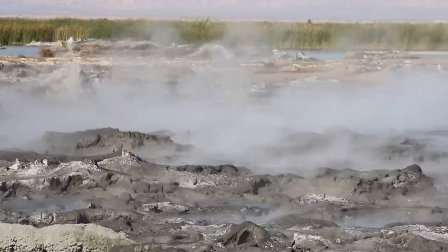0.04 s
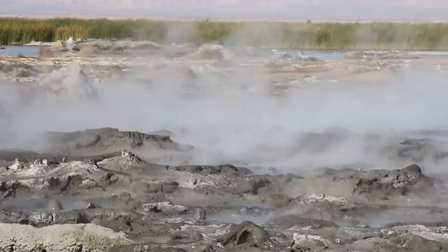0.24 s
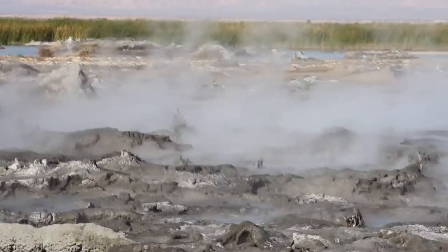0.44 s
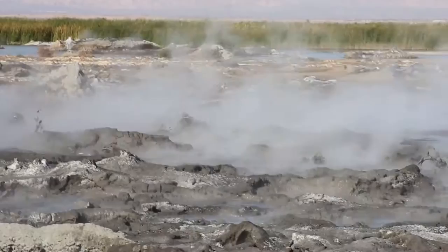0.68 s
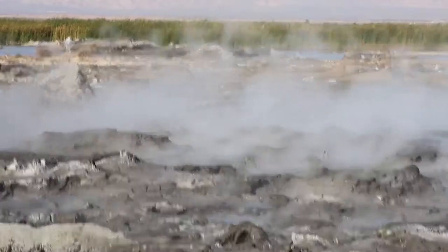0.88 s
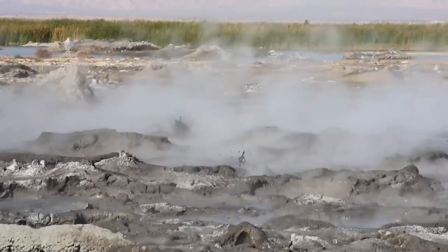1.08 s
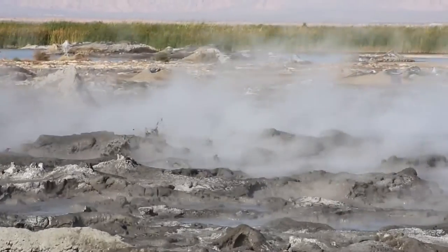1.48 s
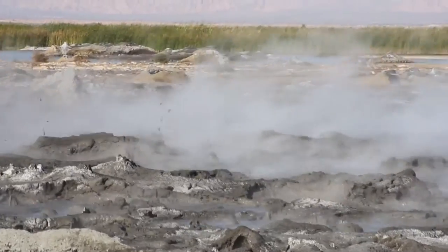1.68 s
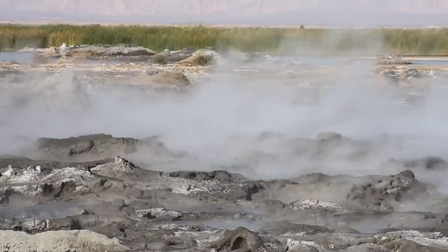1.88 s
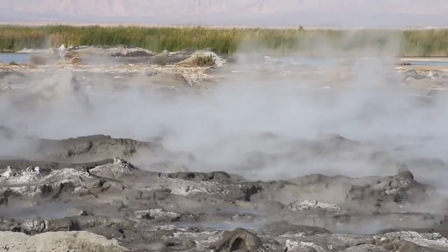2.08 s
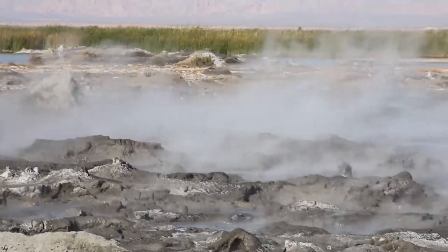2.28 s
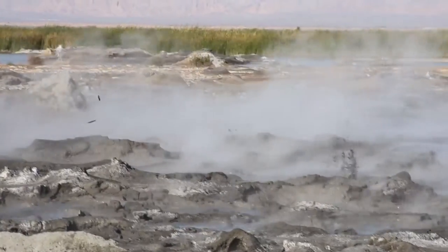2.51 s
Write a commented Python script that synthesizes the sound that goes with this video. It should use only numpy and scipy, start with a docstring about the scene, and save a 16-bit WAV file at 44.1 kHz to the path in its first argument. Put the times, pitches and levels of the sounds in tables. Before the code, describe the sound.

Thick mud boils, with irregular low plops and small wet spatters close to the microphone. Behind them, countless smaller bubbles simmer throughout over a steady steam hiss and a low, uneven rumble, in an open field without echo.

```python
"""An open, flat field of boiling mud pots, with no echo.
Gas bubbles burst in thick mud: each cavity is a damped resonator that rings for a few cycles,
most often rising in pitch as it opens. Films tear, flung mud spatters down, and mounds briefly
scatter these near sounds. Countless smaller bubbles simmer behind them, over a steady hiss
of steam and a low, uneven rumble."""
import sys
import numpy as np
from scipy import signal
from scipy.fft import rfft, irfft
from scipy.io import wavfile
from scipy.ndimage import uniform_filter1d

SR = 44100
rng = np.random.default_rng(int(sys.argv[2]) if len(sys.argv) > 2 else 0)


def dump(signal):
    """Clip the signal to [-1, 1] and save it as 16-bit WAV at the path in sys.argv[1]."""
    limited = np.clip(np.atleast_2d(signal).T, -1, 1)
    pcm = np.round(limited * 32767).astype(np.int16)
    wavfile.write(sys.argv[1], SR, pcm)


N = 116865

# Spectrum of the rumble. Each row: frequency in Hz, relative spectral density in dB.
RUMBLE_SPECTRUM = [(15, -14), (35, -4), (70, -2), (105, -1.5), (180, -20), (500, -68)]
# Low puffs of air. Each row: peak time in seconds, level in dB, rise and decay times in seconds.
AIR_PUFFS = [(.165, -46, .03, .02), (0.267, -31, 0.011, 0.05), (.63, -46, .03, 0.053),
             (0.887, -33.5, 0.028, 0.033), (.955, -38, 0.014, .018), (1.309, -34, 0.036, 0.032),
             (1.61, -56, .03, .08), (1.92, -46, 0.015, 0.025)]
# Spectrum of the steam. Each row: frequency in Hz, relative spectral density in dB.
STEAM_SPECTRUM = [(20, -32), (60, -12.5), (125, 2), (230, 3.5), (400, -7.5), (620, -2), (820, -16),
                  (1150, -13), (2000, -14.5), (2800, -19.5), (3900, -23), (4400, -24.5), (4900, -29),
                  (5600, -34), (7200, -35), (9800, -34.5), (12500, -41), (15500, -45)]
# Vigour of the boiling. Each row: time in seconds, gain in dB.
BOIL_VIGOUR = [(0, -2.5), (.2, -3.5), (.4, 0), (.85, 1), (1.1, 0.5), (1.7, -1), (2.1, -1), (2.38, 1.5),
               (2.5, -7.5), (2.65, -4.5)]
# Snaps of tearing film and falling mud. Each row: peak time in seconds, centre frequency in Hz,
# bandwidth as a share of it, level in dB, decay time in milliseconds, level of the spray in dB.
MUD_SNAPS = [(0.098, 1500, .3, -33, 3.4, -62), (0.101, 2780, .14, -33.5, 4, -60),
             (.229, 1500, .33, -33, 8, -56), (.261, 2300, 0.24, -36.5, 4.4, -66),
             (0.355, 2400, .25, -33.5, 2.3, -60), (.3705, 1650, .38, -23.5, 1.1, -62),
             (0.3722, 2460, 0.17, -30, 1.4, -60), (0.373, 1200, 0.26, -24, 1.3, -60),
             (.396, 1800, .3, -32, 3.4, -65), (.463, 1900, .2, -30, 2, -60),
             (0.4738, 1730, 0.34, -30.5, 5.9, -61), (0.493, 1780, 0.19, -26, 2.4, -58),
             (.499, 2800, 0.32, -39, 1.9, -44), (0.519, 3000, 0.13, -30, 1.6, -42),
             (.608, 1890, 0.33, -33, 2.4, -55), (0.693, 2300, 0.38, -35.5, 2.1, -54),
             (.709, 1650, .3, -35.5, 6, -58), (.843, 1150, .2, -31, 3, -62),
             (.884, 1500, 0.41, -33.5, 6.4, -58), (1.085, 1950, 0.22, -36, 2.9, -63),
             (1.120, 2000, .3, -44, 4, -49), (1.18, 2550, .15, -33.5, 2.7, -52),
             (1.357, 1940, 0.23, -34.5, 4.8, -58), (1.398, 1300, 0.35, -31, 9, -59),
             (1.678, 3100, 0.21, -35.5, 1.9, -46.5), (1.787, 2680, .3, -40, 3, -58),
             (1.816, 2900, .3, -37.5, 4.5, -47.5), (1.844, 2380, .12, -33, 5, -48.5),
             (1.875, 1550, 0.23, -30.5, 4, -57), (1.905, 845, .3, -28, 4, -64),
             (1.906, 2100, .28, -38, 3.6, -62), (1.917, 1300, .25, -30, 3, -60),
             (1.931, 1400, 0.51, -41, 10, -60), (1.953, 1600, 0.17, -34.5, 4, -62),
             (1.965, 1100, .3, -29, 3, -50), (2.184, 3380, 0.28, -36.5, 2.2, -54),
             (2.210, 1600, 0.32, -32.5, 5.2, -60), (2.378, 1390, 0.26, -30.5, 2.8, -55),
             (2.400, 2100, .15, -39, 6.5, -62), (2.413, 3950, .08, -37, 3.5, -53.5),
             (2.449, 1350, .45, -33.5, 5.8, -60)]
# Large bursting bubbles. Each row: peak time in seconds, pitch in Hz, peak level in dB,
# decay time in milliseconds, glide at the peak in octaves per 10 milliseconds (negative falls).
LARGE_BUBBLES = [(.062, 650, -35, 8.7, 0.02), (.069, 196, -22.5, 3.7, -0.16), (.101, 280, -21.5, 4.9, 0.17),
                 (0.224, 203, -21.5, 5, -0.08), (0.2572, 245, -13, 3.4, -0.2), (.266, 87, -17, 11, -0.03),
                 (0.2697, 252, -4.2, 3.6, 0.022), (.280, 300, -22, 3.5, 0), (.309, 195, -22, 8.5, -0.19),
                 (.376, 290, -21, 2.3, 0.069), (.3865, 253, -12, 6.8, 0.51),
                 (0.417, 267, -22.5, 5.1, -0.25), (.444, 300, -23.5, 5.2, 0.21),
                 (.452, 463, -27.5, 9.6, 0.071), (.474, 636, -27, 4.3, 0.16), (.505, 570, -27.5, 2.4, 0.51),
                 (.5197, 1020, -17.5, 0.9, 0.1), (0.523, 214, -21, 2.6, -0.49),
                 (.536, 510, -29, 2.6, -0.097), (.590, 135, -33, 17, -0.086), (.599, 218, -20, 3.5, -0.036),
                 (.640, 690, -23, 2.4, 0.61), (0.686, 132, -32, 9.3, -0.052), (.698, 370, -29.5, 4.8, 0.24),
                 (0.757, 275, -16.5, 8.5, .48), (.769, 230, -23, 6, -.2), (.775, 120, -29, 11, 0.082),
                 (.791, 215, -22.5, 4, -0.1), (.807, 210, -24, 3.5, 0), (.822, 140, -25, 6, 0.2),
                 (.835, 222, -16.3, 4.6, 0.05), (.8435, 630, -23, 2.6, 0.3), (.852, 220, -22.5, 4.5, 0),
                 (.874, 135, -28, 10, 0), (.904, 215, -24.5, 6, .1), (.883, 900, -31, 3.3, 0.32),
                 (.914, 694, -24, 1, 0.017), (.9605, 690, -24, 1.5, 0.15), (0.986, 276, -24.5, 6.7, -0.041),
                 (1.039, 198, -25, 5, 0.53), (1.08, 289, -23.5, 3.7, -0.12), (1.134, 523, -28, 5.5, 0.21),
                 (1.149, 500, -17.5, 0.66, 0.11), (1.18, 1130, -31, 2.5, 0.058),
                 (1.2235, 590, -23, 3.4, 0.13), (1.245, 222, -20, 3.1, 0.3),
                 (1.256, 292, -18.5, 2.8, -0.22), (1.2645, 700, -29.5, 3, 0.1),
                 (1.335, 290, -23.5, 6.8, 0.47), (1.349, 537, -30, 10, 0.24),
                 (1.442, 275, -16.5, 3.7, 0.54), (1.459, 491, -31, 4.9, 0.21),
                 (1.479, 278, -19.5, 2.5, -0.11), (1.5905, 712, -24, 1.5, 0.098),
                 (1.604, 259, -28, 3.8, .1), (1.607, 520, -19.5, 0.84, 0.16), (1.678, 960, -23, 2.1, .1),
                 (1.732, 264, -22, 3.3, 0.39), (1.7545, 580, -22.5, 2.2, 0.5), (1.765, 900, -29, 6, 0.38),
                 (1.806, 285, -22.5, 3.5, -0.12), (1.807, 1050, -30, 2, 0.22),
                 (1.9085, 210, -10.5, 3.1, -0.086), (1.914, 102, -29, 11, 0.025),
                 (1.9225, 275, -17, 8, -.2), (1.966, 402, -25.5, 1.8, -0.21),
                 (1.985, 128, -27.5, 18, -0.45), (2.033, 513, -26, 2, 0.6), (2.055, 710, -27.5, 1.7, .2),
                 (2.072, 290, -26, 4, .05), (2.235, 262, -23.5, 8.5, 0.31), (2.290, 620, -31, 7, .35),
                 (2.317, 245, -17, 5.5, .42), (2.335, 270, -22.5, 8.2, 0.013), (2.353, 560, -29, 3.5, .1),
                 (2.3735, 220, -16, 3.6, -0.05), (2.397, 215, -26, 6, 0), (2.379, 620, -21.5, 0.89, 0.25),
                 (2.407, 320, -27, 6, 0.15), (2.625, 199, -27.5, 10, 0.21)]


def amp(db):
    """Converts decibels to an amplitude ratio."""
    return 10 ** (np.asarray(db) / 20)


def unit(x):
    """Normalises a signal to an rms of 1."""
    return x / np.sqrt(np.mean(x ** 2) + 1e-20)


def add(mix, start_s, sound):
    """Superposition: a sound adds linearly to the mix."""
    part = mix[max(round(start_s * SR), 0):][:len(sound)]
    part += sound[:len(part)]


def envelope(t, rise, decay):
    """Exponential decay after a smooth rise that peaks at t = 0."""
    return np.cos(np.pi / 2 * np.clip(t / rise, -1, 0)) ** 2 * np.exp(-np.maximum(t, 0) / decay)


def band_noise(size, hz, width):
    """Band-pass filtering: noise in a bell-shaped band whose width is a share of its centre."""
    freqs = np.fft.rfftfreq(size, 1 / SR)
    bell = np.exp(-.5 * (np.log((freqs + 1) / hz) / width) ** 2)
    return unit(irfft(rfft(rng.standard_normal(size)) * bell, size))


def coloured(noise, spectrum):
    """Spectral shaping: noise follows a curve on a log-frequency axis, at an rms of 1."""
    hz, db = np.transpose(spectrum)
    gain = amp(np.interp(np.log(np.fft.rfftfreq(N, 1 / SR) + 1), np.log(hz), db))
    return unit(irfft(rfft(noise) * gain, N))


def rumble(floor_db=-55):
    """Amplitude modulation: low noise swells with each short puff of air."""
    t = np.arange(N) / SR
    puffs = sum(amp(db) * envelope(t - s, rise, decay) for s, db, rise, decay in AIR_PUFFS)
    return (amp(floor_db) + puffs) * coloured(rng.standard_normal(N), RUMBLE_SPECTRUM)


def steam(level_db=-36.5, patch_db=1.13, swell_db=.71):
    """Incoherent sources: steam and far pots blur into noise with drifting patches and a slight swell."""
    frames, bins = N // 128 + 5, 257
    real, imag, patches = rng.standard_normal((3, frames, bins))
    patches = uniform_filter1d(patches, size=9, axis=0)  # smooth in time
    patches = unit(uniform_filter1d(patches, size=12, axis=1))  # and in frequency
    swell = unit(uniform_filter1d(rng.standard_normal(frames), size=40))
    spectra = (real + 1j * imag) * amp(patch_db * patches + swell_db * swell[:, None])
    noise = signal.istft(spectra.T, nperseg=512, noverlap=384)[1][:N]
    return amp(level_db) * coloured(noise, STEAM_SPECTRUM)


def vent(level_db=-62):
    """Narrow-band noise: a narrow vent colours the hiss."""
    return amp(level_db) * band_noise(N, hz=4350, width=.035)


def cavity(hz, decay, octaves_per_s, rise_cycles=1.413, glide_s=.0265):
    """Damped resonance: an opening bubble rings and glides. Returns the ring and its rise time."""
    rise = rise_cycles / hz
    t = np.arange(-rise, 8 * decay, 1 / SR)
    pitch = hz * 2 ** (octaves_per_s * glide_s * np.tanh(t / glide_s))  # the glide levels off
    hold = .68 * decay  # rounds the peak
    rounded_t = np.where(t > 0, np.hypot(t, hold) - hold, t)
    tone = np.sin(2 * np.pi * np.cumsum(pitch) / SR)
    return envelope(rounded_t, rise, decay) * tone, rise


def crowd(low_hz, high_hz, per_s, spread_db, decay_cycles, octaves_per_cycle):
    """A Poisson process: small bubbles of many sizes burst independently, scaled to an rms of 1."""
    out = np.zeros(N)
    pitches = np.geomspace(low_hz, high_hz, 32)
    for hz in pitches:
        decay_factor, glide_factor = rng.uniform(.5, 1.5, 2)
        strengths = amp(spread_db * np.minimum(rng.exponential(1, N), 3.5))
        bursts = strengths * (rng.random(N) < per_s / len(pitches) / SR)
        octaves_per_s = min(octaves_per_cycle * hz * glide_factor, 60)
        ring, _ = cavity(hz, decay_cycles * decay_factor / hz, octaves_per_s)
        out += signal.oaconvolve(bursts, ring)[:N]
    return unit(out)


def bubbling():
    """Smaller cavities resonate higher: five crowds, the lowest three following the boil's vigour."""
    glugs = crowd(100, 160, per_s=70, spread_db=1.6, decay_cycles=1.7, octaves_per_cycle=.02)
    gurgle = crowd(162, 333.5, per_s=221.5, spread_db=1.3, decay_cycles=1.07, octaves_per_cycle=.1)
    simmer = crowd(377.5, 1151, per_s=446.5, spread_db=1, decay_cycles=1, octaves_per_cycle=0)
    patter = crowd(1106, 2350, per_s=482.5, spread_db=2.5, decay_cycles=2.5, octaves_per_cycle=-.48)
    fizz = crowd(5500, 11500, per_s=171, spread_db=2.5, decay_cycles=.5, octaves_per_cycle=1)
    vigour = amp(np.interp(np.arange(N) / SR, *np.transpose(BOIL_VIGOUR)))
    boil = amp(-46) * glugs + amp(-37) * gurgle + amp(-42) * simmer
    return vigour * boil + amp(-47) * patter + amp(-69) * fizz


def mounds(direct, scatter_db=-15):
    """Diffuse scattering: uneven mud mounds add a brief tail to the direct sound."""
    t = np.arange(0, .12, 1 / SR)
    tail = rng.standard_normal(len(t)) * envelope(t - .008, rise=.0041, decay=.028)
    return direct + amp(scatter_db) * signal.oaconvolve(direct, tail / np.linalg.norm(tail))[:N]


def spatter():
    """Short transients have broad spectra: film tears and mud lands in noisy snaps with fine spray."""
    out = np.zeros(N)
    t = np.arange(-.01, .05, 1 / SR)
    for peak_s, hz, width, db, decay_ms, spray_db in MUD_SNAPS:
        decay = decay_ms / 1000
        shape = envelope(t, .39 * decay, decay)  # short snaps are crisp, long splashes swell
        snap = amp(db) * unit(shape * band_noise(len(t), hz, width))
        spray = amp(spray_db) * unit(shape * band_noise(len(t), hz=7700, width=.33))
        tone_rms = np.sqrt(np.mean(shape ** 2) / 2)  # of a sine under the same envelope
        add(out, peak_s + t[0], (snap + spray) * tone_rms)
    return out


def plops():
    """Free oscillation: each large, near bubble sets its cavity ringing as it bursts."""
    out = np.zeros(N)
    for peak_s, hz, db, decay_ms, glide in LARGE_BUBBLES:
        ring, rise = cavity(hz, decay_ms / 1000, octaves_per_s=glide * 100)
        add(out, peak_s - rise, amp(db) * ring)
    return out


def scene():
    """Superposition: near plops and spatter add to the simmering field in one channel."""
    background = bubbling() + steam() + vent() + rumble()
    return (background + mounds(plops() + spatter()))[None]


def record(dry, cutoff_hz=15700):
    """Band limiting: a steep low-pass filter removes the highest treble."""
    lowpass = signal.firwin(511, cutoff_hz, window=("kaiser", 9), fs=SR)
    return signal.oaconvolve(dry, lowpass[None], "same")


dry = scene()
out = record(dry)
dump(out)
```